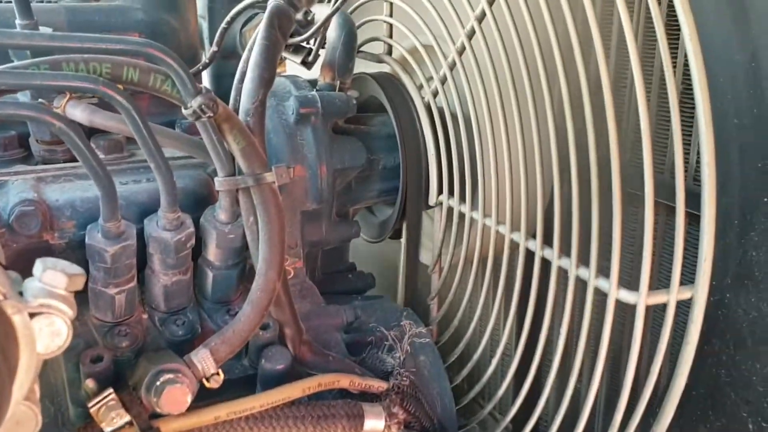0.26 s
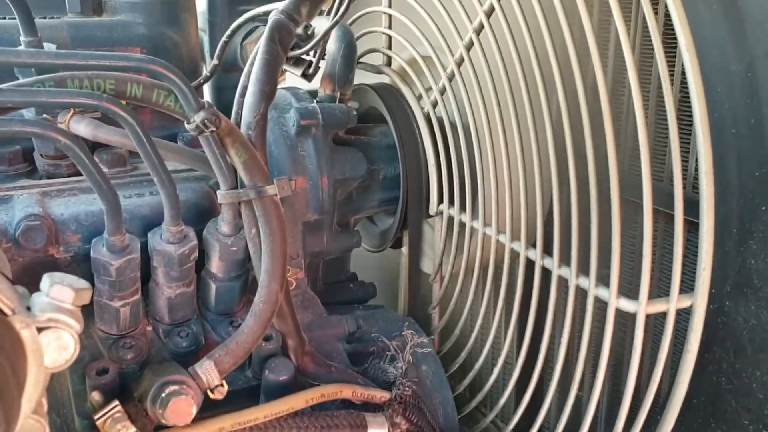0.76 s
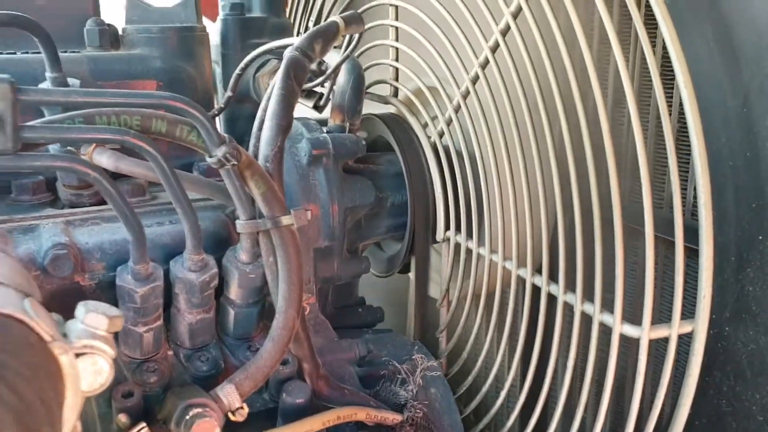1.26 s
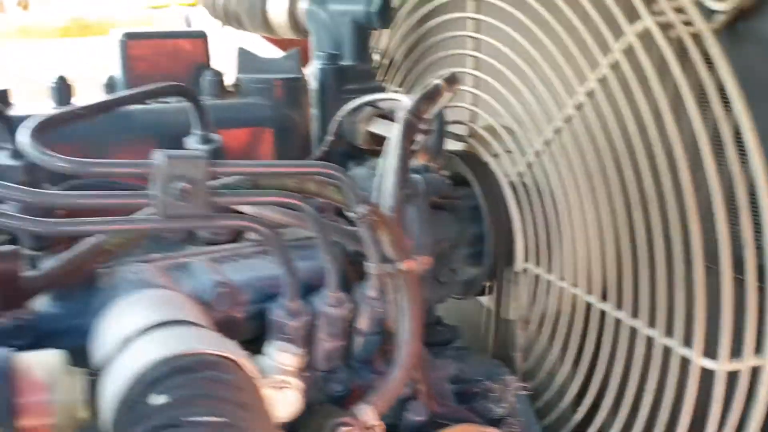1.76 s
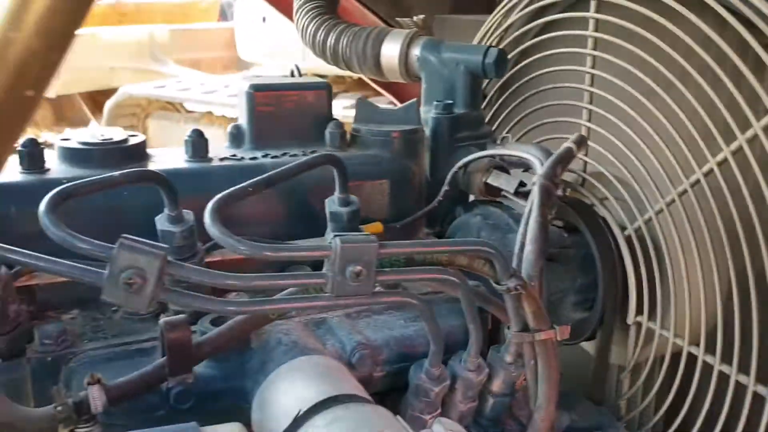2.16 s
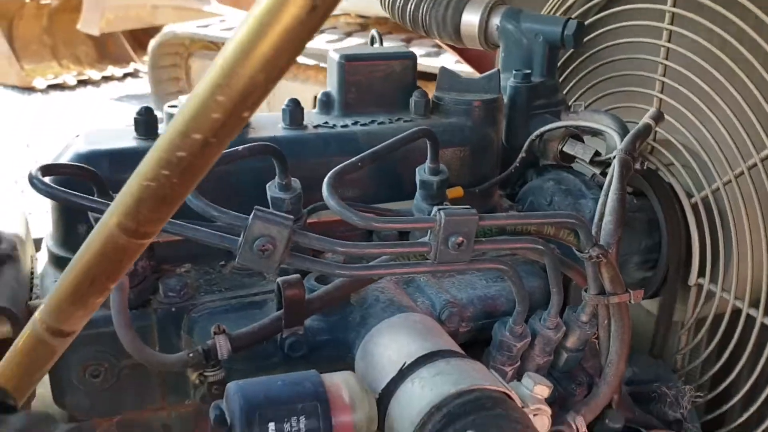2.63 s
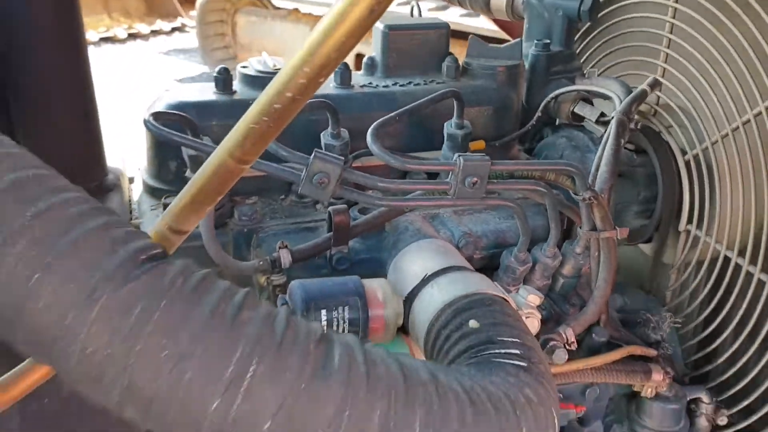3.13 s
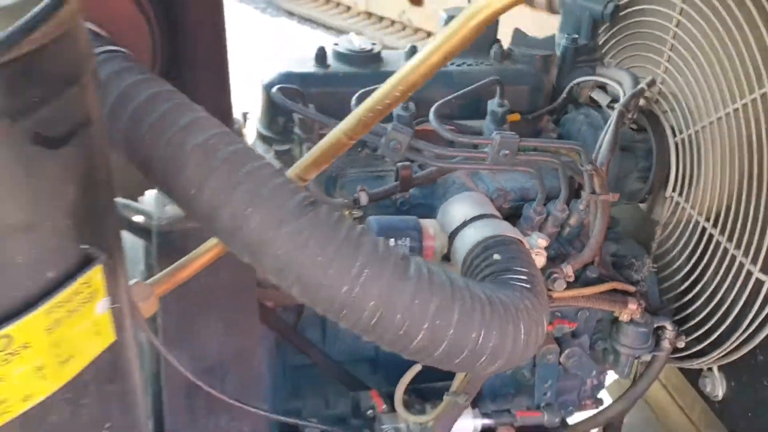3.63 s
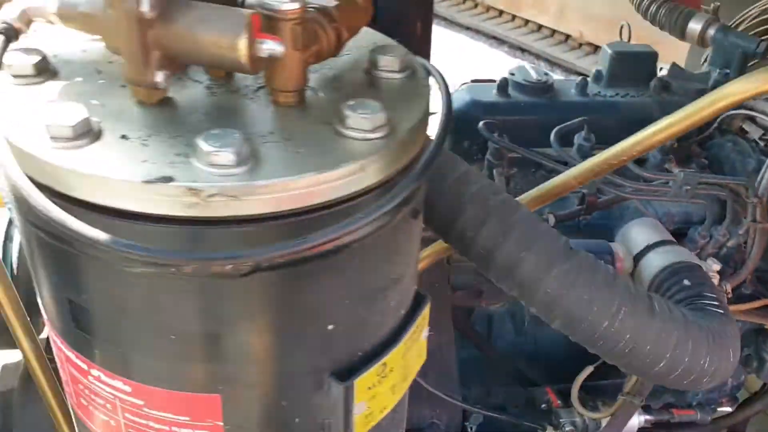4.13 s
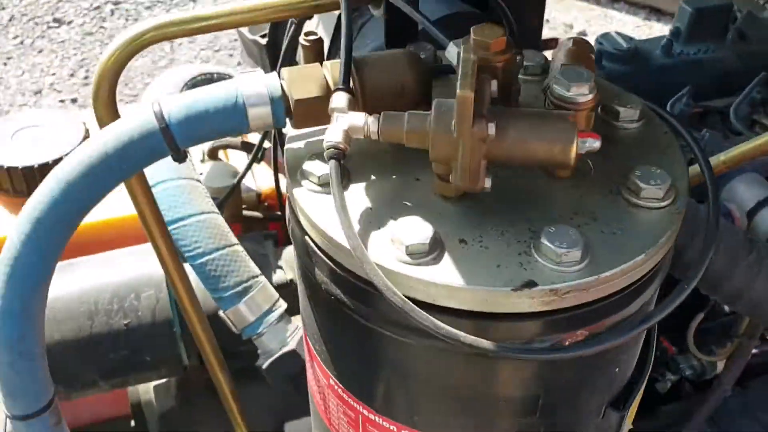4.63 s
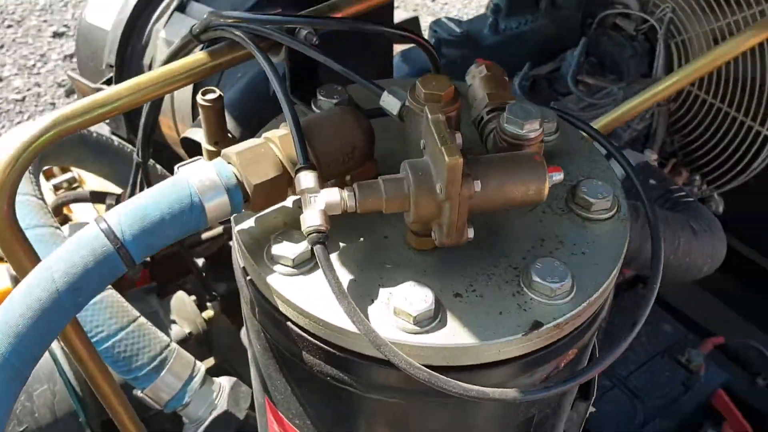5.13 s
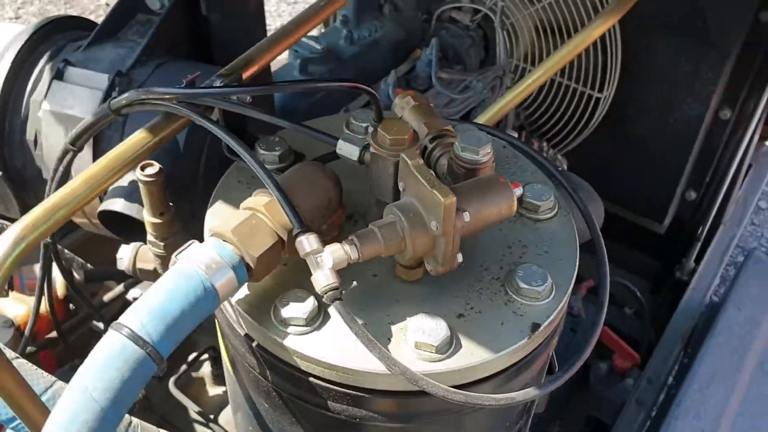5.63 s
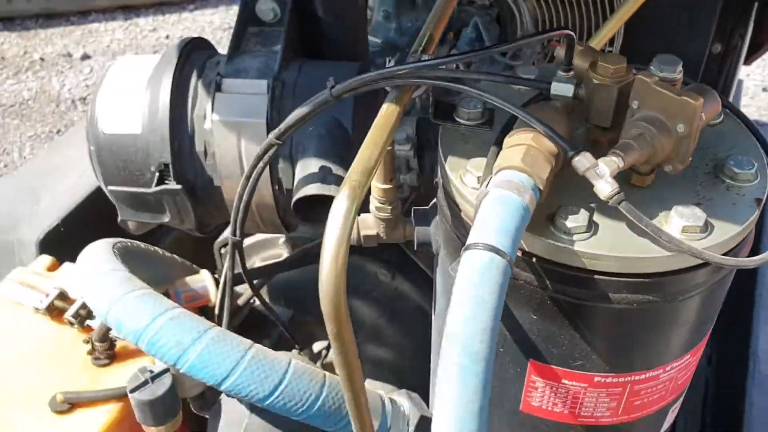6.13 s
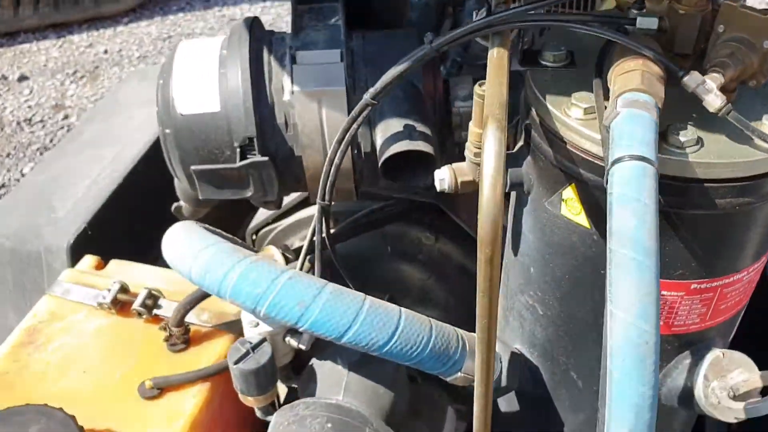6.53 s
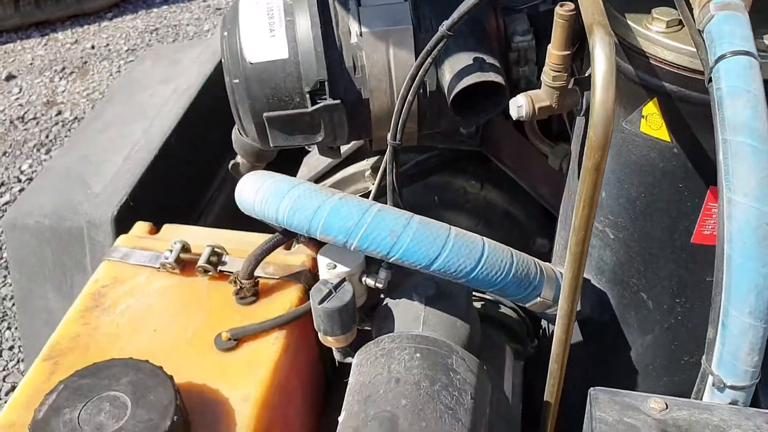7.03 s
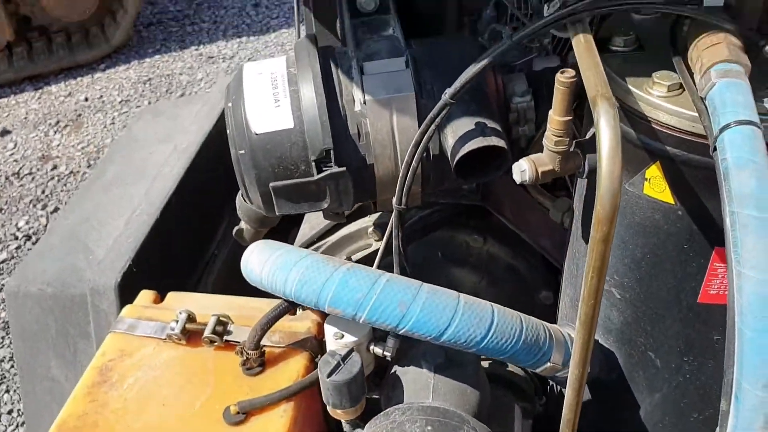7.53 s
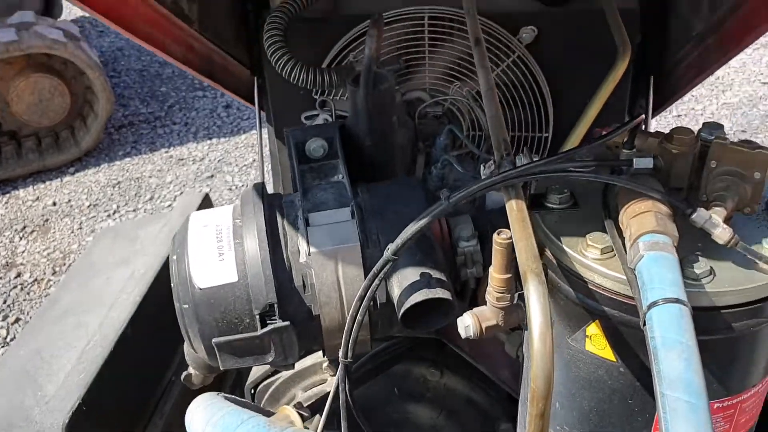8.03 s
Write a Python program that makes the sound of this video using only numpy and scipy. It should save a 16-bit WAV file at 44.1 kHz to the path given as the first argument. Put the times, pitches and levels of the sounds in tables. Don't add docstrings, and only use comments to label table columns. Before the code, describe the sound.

A small three-cylinder diesel runs an air compressor outdoors, already at steady speed and continuing to the end at about 8.3 seconds. From 0 to 1.5 seconds the phone is close to the injectors and fan: a low buzzing drone at roughly 53 hertz, rapid knocking clatter, whirring blade tones, broad airy roar and a bright compressed-air hiss. From about 1.7 to 3 seconds it backs away; engine and roar drop, while hiss leans to the left. Between 3 and 4.7 seconds, around the tank, tones are thinnest and the sound is at its weakest, the hiss sliding in colour. From 5 seconds it nears the intake, and by 6 the bass, clatter and roar are full again, with the hiss stronger on the right. It stays loud and dense, swelling slightly, without any stop. The stereo is wide, rough and close, with slightly rounded peaks and limited top treble.

```python
import sys
import numpy as np
from scipy import signal
from scipy.fft import rfft, irfft
from scipy.io import wavfile
from scipy.ndimage import uniform_filter1d, map_coordinates

SR = 44100
rng = np.random.default_rng(int(sys.argv[2]) if len(sys.argv) > 2 else 0)


def linear_from_db(decibels):
    return 10 ** (np.asarray(decibels, float) / 20)


def master_out(mix):
    frames = np.transpose(np.atleast_2d(mix))
    ceiling = np.clip(frames, -1, 1)
    pcm = np.round(ceiling * 32767).astype(np.int16)
    wavfile.write(sys.argv[1], SR, pcm)


N = 365148
FRAME = 512
SEAM_HZ = 4100


def unit(x):
    return x / np.sqrt(np.mean(x ** 2) + 1e-20)


def along(points, hz):
    f, v = np.transpose(points)
    return np.interp(np.log(hz + 1), np.log(f + 1), v)


def curves(rows, t=None):
    s, *cols = np.transpose(rows)
    at = np.arange(N) / SR if t is None else t
    return np.array([np.interp(at, s, c) for c in cols])


def wobble(rate_hz):
    knots = rng.standard_normal(int(N * rate_hz / SR) + 4)
    return map_coordinates(knots, [np.arange(N) * rate_hz / SR])


def spread(knots_hz, gains_db, hz):
    share = np.array([along(list(zip(knots_hz, one)), hz) for one in np.eye(len(knots_hz))])
    return share.T @ gains_db


def answer(rules, controls, t=None):
    rules = np.atleast_2d(rules)
    return rules[:, :1] + rules[:, 1:] @ curves(controls, t)


# t/s, nearness/dB, end faced (1 fan, -1 intake), left port's view into hood/dB
PHONE = [(0, 1.5, 0.51, 2), (.8, 2, 1, 0), (1.5, 1.5, 1, 0), (2, -.5, 0.8, 1.5), (2.4, -4, 0.093, 5),
         (2.8, -6, 0.55, 5.5), (3.2, -7.5, 0.57, 2.5), (3.7, -8, .1, -3), (4.2, -8, -0.11, 1.5),
         (4.5, -7.5, -0.43, 0), (4.8, -2.5, -0.19, -4.5), (5.3, -4, -1.15, -0.5), (5.7, 0, -0.95, 0.5),
         (6, 2.5, -1.24, 1), (6.8, 3.5, -0.54, -2.5), (7.6, 3.5, -1.44, -1), (8.28, 5, -1.06, -0.5)]


def by_phone(rules, t=None):
    return answer(rules, PHONE, t)


# t/s, place (0 injectors, 1 tank, 2 intake)
WALK = [
    (0, 0.048),
    (1.5, 0.14),
    (2.4, 0.62),
    (3.2, 1.34),
    (4.6, 1.06),
    (5.4, 1.43),
    (6.1, 1.92),
    (8.28, 1.97),
]


def place():
    return curves(WALK)[0]


def placed(levels_db):
    return np.interp(place(), np.arange(len(levels_db)), levels_db)


# t/s, four-stroke cycle rate/Hz
SPEED = [(0, 17.68), (.8, 17.705), (1.6, 17.695), (2.4, 17.661), (3.5, 17.63), (4.8, 17.652), (5.4, 17.7),
         (6.4, 17.72), (6.8, 17.74), (7.6, 17.736), (8.28, 17.753)]


def cycles():
    return np.cumsum(curves(SPEED)[0]) / SR


CYLINDERS = [0, -3, -0.79]


def firing_shape(turn, decay):
    stroke = turn * len(CYLINDERS)
    cylinder = np.floor(turn % 1 * len(CYLINDERS)).astype(int)
    return linear_from_db(np.array(CYLINDERS)[cylinder]) * np.exp(-(stroke % 1) / decay)


# t/s, left-right/dB
TONE_PAN = [(0, 4.5), (1.4, 4.5), (2, 3), (4.5, 3.5), (6, 3.5), (8.28, 1.5)]


def tone_pan_db():
    return curves(TONE_PAN)[0]


def tone(turns, level_db, pan_db, flutter_db, drift=0.23, start=None):
    start = rng.random() if start is None else start
    phase = 2 * np.pi * (turns + start) + drift * np.array([wobble(3), wobble(2.6)])
    gain = linear_from_db(level_db + pan_db / 2 * np.array([[1], [-1]]) + flutter_db * wobble(5))
    return np.sqrt(2) * gain * np.sin(phase)


def rush(size, shape, patchy_db, ripple_db, port_turn=0):
    hz, t, z = signal.stft(rng.standard_normal((3, N)), SR, nperseg=size)
    level_db, alike, lead_ms = shape(hz, t)
    alike = np.clip(alike, 0, 1)
    turn = np.exp(1j * np.pi * (hz[:, None] * lead_ms / 1000 + port_turn))
    shared = np.sqrt(alike) * z[0] * np.array([turn, 1 / turn])
    pair = shared + np.sqrt(1 - alike) * z[1:]

    def field(bins, frames):
        across = uniform_filter1d(rng.standard_normal(pair.shape), bins, axis=1)
        return unit(uniform_filter1d(across, frames, axis=2))
    patches_db = patchy_db * field(bins=5, frames=9)
    echoes_db = ripple_db * field(bins=4, frames=SR // size * 2)
    gain = np.sqrt(SR / 2) * linear_from_db(level_db + patches_db + echoes_db)
    return signal.istft(pair * gain, SR, nperseg=size)[1][:, :N]


# t/s, left port lead/ms, share of direct sound
LEAK = [(0, .465, .45), (1.7, .465, .45), (1.9, .54, .7), (2.9, .54, .8), (3.2, .49, .65), (3.45, .44, .5),
        (3.9, .25, .35), (4.4, .12, .3), (5, -.03, .3), (5.5, .04, .55), (5.75, .1, .5), (6.2, .02, .45),
        (7.3, -.04, .4), (7.8, .04, .45), (8.28, -.02, .3)]


def leak_direction(t):
    return curves(LEAK, t)


# f/Hz, level/dB per Hz
ROAR_LEFT = [(25, -69), (40, -57), (75, -60.5), (130, -55.5), (200, -57.5), (300, -60), (420, -60),
             (600, -63), (900, -60.5), (1300, -62.5), (1900, -64), (2700, -63.5), (3600, -62.5),
             (4600, -60)]
ROAR_RIGHT = [(25, -59), (40, -53.5), (75, -55), (130, -59), (200, -57), (300, -65), (420, -67), (600, -67),
              (900, -66.5), (1300, -71), (1900, -65.5), (2700, -76), (3600, -70), (4600, -74)]
# f/Hz, share
ROAR_ALIKE = [(40, .9), (130, 0.32), (300, 0.71), (700, 0.8), (1400, 0.21), (3000, 0.025)]
# mean/dB, per dB nearness, dB per end, per dB view
ROAR_ANSWER = [
    (-0.74, 0.9, 2, 1),
    (-0.41, 1.25, 0, 0.22),
    (-0.25, 0.69, 1.25, 0.73),
    (0.33, 1.47, -0.05, 0.5),
]


def roar():
    def shape(hz, t):
        bass_left, bass_right, middle_left, middle_right = by_phone(ROAR_ANSWER, t)
        exhaust_db = curves(PHONE, t)[0]
        deep = 0.83 * (uniform_filter1d(exhaust_db, size=9) - np.median(exhaust_db))
        knots_hz = [110, 450, 2200]
        left = along(ROAR_LEFT, hz)[:, None] + spread(knots_hz, [deep, bass_left, middle_left], hz)
        right = along(ROAR_RIGHT, hz)[:, None] + spread(knots_hz, [deep, bass_right, middle_right], hz)
        edge_db = np.where((hz > 30) & (hz < SEAM_HZ), -1.5, -120)[:, None]
        lead_ms = 0.57 * leak_direction(t)[0]
        return np.array([left, right]) + edge_db, along(ROAR_ALIKE, hz)[:, None], lead_ms
    turns = cycles()
    firing = (turns * len(CYLINDERS)).astype(int)
    uneven = linear_from_db(rng.normal(0, 4, firing[-1] + 1))[firing]
    swell = unit(1 + 0.23 * uneven * firing_shape(turns, decay=.35))
    return rush(4 * FRAME, shape, patchy_db=2.04, ripple_db=1.5) * swell


def dips(rows, hz, t):
    width, fade_s = 0.07, 0.14
    loss = 0
    for start, end, from_hz, to_hz, depth_db in rows:
        centre = np.interp(t, [start, end], [from_hz, to_hz])
        present = np.clip(np.minimum(t - start, end - t) / fade_s, 0, 1)
        loss = loss - depth_db * present * np.exp(-((hz[:, None] / centre - 1) / width) ** 2)
    return loss


# f/Hz, level/dB per Hz
HISS_LEFT = [(3600, -67), (4600, -64.5), (5500, -64), (6500, -62.5), (7400, -65.5), (7900, -67.5),
             (8250, -72.5), (8900, -67), (9600, -68), (10500, -62.5), (11500, -57), (12500, -59),
             (14000, -58), (15600, -63.5)]
HISS_RIGHT = [(3600, -66), (4600, -70.5), (5500, -70.5), (6500, -62.5), (7400, -68), (7900, -76),
              (8250, -68.5), (8900, -82.5), (9600, -72.5), (10500, -67.5), (11500, -64), (12500, -58),
              (14000, -62), (15600, -58)]
# f/Hz, part of the direct share
LEAK_ALIKE = [(4000, .4), (6500, .9), (8500, .3), (10300, .4), (11500, 1), (15000, 1)]
# t/s, jet strength/dB, right port turned to it/dB, brightening/dB, left port in beam/dB
JET = [(0, 2, 2.5, -3.5, -1.5), (1.12, 3, 3, -2, -2), (1.56, 3, -0.5, -2.5, -1), (2, 4, -9.5, 1, 1),
       (2.92, 2, -13, 6, 1.5), (3.08, 0, -7, 3.5, -1), (3.44, -1.5, -13, -2.5, -2),
       (3.84, -3, -25, 0, -0.5), (4.04, -4, -8, 3, 1), (4.52, -4.5, -2, 2, 0.5), (4.84, -4.5, 2.5, -2.5, 1),
       (5.2, -3, 8, -3, 7), (5.45, -1.5, 6.5, -3, 0.5), (5.72, 3, 11.5, 0.5, 4), (6.2, 1, 9.5, 1.5, -1),
       (6.76, -0.5, 8.5, 2.5, -2.5), (7.6, -1, 4.5, -1.5, -6.5), (8.28, -0.5, 8.5, -2.5, 8)]
SHADE_HZ = [6600, 9500, 12000, 14600]
# mean/dB, dB per dB of strength, turning, brightening, beam
LEFT_ANSWER = [(1, 0.74, 0.039, -0.046, 0.02), (2.5, 1.02, .01, 0.17, 0.18),
               (0.5, 0.73, -0.061, 0.05, 0.86), (.1, 1.87, -.1, 0.017, -.4)]
RIGHT_ANSWER = [(0.95, 1.4, 0.011, -0.35, -0.15), (-0.92, .01, 1.22, -0.83, 0.074),
                (0.25, 0.32, 0.76, 1.2, .1), (-1.2, .1, 0.12, .8, -.1)]
# start t/s, end t/s, start f/Hz, end f/Hz, depth/dB
DIPS_LEFT = [
    (3.0, 3.6, 11600, 10700, 4),
    (5.0, 6.1, 9000, 8600, 4.5),
    (6.25, 6.7, 5100, 4800, 7),
    (6.6, 7.7, 10100, 10600, 3),
]
DIPS_RIGHT = [
    (1.5, 3.1, 5260, 4850, 3.4),
    (1.6, 4.3, 10500, 10600, 5),
    (4.5, 6.3, 5870, 6300, 14),
    (4.5, 6.5, 8850, 8800, 3.6),
    (6.25, 6.7, 5100, 4900, 7),
]


def hiss():
    def shape(hz, t):
        left_shade = spread(SHADE_HZ, answer(LEFT_ANSWER, JET, t), hz)
        right_shade = spread(SHADE_HZ, answer(RIGHT_ANSWER, JET, t), hz)
        left = along(HISS_LEFT, hz)[:, None] + left_shade + dips(DIPS_LEFT, hz, t)
        right = along(HISS_RIGHT, hz)[:, None] + right_shade + dips(DIPS_RIGHT, hz, t)
        lead_ms, direct = leak_direction(t)
        edge_db = np.where(hz >= SEAM_HZ, 0, -120)[:, None]
        return np.array([left, right]) + edge_db, along(LEAK_ALIKE, hz)[:, None] * direct, lead_ms
    return rush(FRAME, shape, patchy_db=1.08, ripple_db=0.77, port_turn=-.3)


# mean/dB, per dB nearness, dB per end, per dB view
BLADES = [
    (-37, 1.14, 5.5, -0.11),
    (-47, 1.16, 1.5, -.1),
]
# level/dB at injectors, tank, intake
FAN_UPPER = [
    (-44, -63, -56),
    (-47.5, -58, -55),
]
# level/dB at injectors, tank, intake
BEAT_DB = [-47.5, -60.5, -42.5]


def fan():
    blades_per_cycle = 12.866
    beat_order, beat_start_turns = 13, -.03
    levels_db = [*by_phone(BLADES), *map(placed, FAN_UPPER)]
    engine_turns, pan_db = cycles(), tone_pan_db()
    turns = blades_per_cycle * engine_turns + 0.039 * wobble(4)
    out = tone(beat_order * engine_turns, placed(BEAT_DB), pan_db, flutter_db=4.0, drift=0.16,
               start=beat_start_turns)
    for k, db in enumerate(levels_db):
        out += tone((k + 1) * turns, db, pan_db, flutter_db=1.2 + .3 * k, drift=0.15 + 0.2 * k, start=0)
    return out


# f/Hz, level/dB
KNOCK = [(250, -120), (330, 6.5), (700, -10), (1200, 2.5), (1900, -1), (2600, -5.5), (4500, -10.5),
         (6000, -120)]
# level/dB at injectors, intake
KNOCK_DB = [-41, -42.5]


def knock():
    size = 1024
    turns, rate_hz = cycles(), curves(SPEED).mean()
    blows = firing_shape(np.arange(size) / size, decay=0.21) + 0.41
    common = rng.standard_normal((2, 1, size))
    raw = common + 0.84 * rng.standard_normal((2, 2, size))
    colour = linear_from_db(along(KNOCK, rate_hz * np.arange(size // 2 + 1)))
    cycle = irfft(rfft(raw * blows) * colour, size)
    where = [turns % 1 * size]
    heard = [[map_coordinates(unit(c), where, mode="grid-wrap") for c in end] for end in cycle]
    far = np.clip(place() / 2, 0, 1)
    near_gain = linear_from_db(KNOCK_DB[0]) * np.sqrt(1 - far)
    far_gain = linear_from_db(KNOCK_DB[1]) * np.sqrt(far)
    mix = near_gain * heard[0] + far_gain * heard[1]
    return mix * linear_from_db(by_phone(ROAR_ANSWER[:2]) + 0.83 * wobble(8))


# mean/dB, per dB nearness, dB per end, per dB view
THIRD = (-39.5, 0.72, -2.5, -0.2)
ORDERS = [4, 5, 6, 7, 8, 10, 11, 12, 14, 15, 39, 17, 19, 20, 22, 30, 38, 43, 56, 91, 102, 111]
# level/dB at injectors, tank, intake
ORDERS_HEARD = [(-63, -71, -58), (-52, -68, -62), (-43, -87, -52), (-42, -60, -51), (-59, -70, -57),
                (-48, -56, -55), (-47, -72, -65), (-35.5, -50, -47), (-47, -65, -44), (-40, -66, -40.5),
                (-53, -75, -46.5), (-60, -89, -57), (-46.5, -66, -54), (-57, -67, -51.5),
                (-45.5, -55.5, -53.5), (-55, -63.5, -48), (-46, -77, -64), (-61, -86, -54), (-61, -72, -47),
                (-45, -70, -60), (-47.5, -67, -61), (-46, -61, -50.5)]


def engine():
    firing_db = -30 + curves(PHONE)[0]
    third_db = by_phone(THIRD)[0]
    turns, pan_db = cycles(), tone_pan_db()
    out = tone(len(CYLINDERS) * turns, firing_db, pan_db, flutter_db=.2, drift=.05, start=0)
    out += tone(len(CYLINDERS) ** 2 * turns, third_db, pan_db, flutter_db=1.2, drift=.15, start=.5)
    for order, levels_db in zip(ORDERS, ORDERS_HEARD):
        start = 0 if order == 15 else None
        order_pan_db = pan_db + rng.normal(0, 2)
        out += tone(order * turns, placed(levels_db), order_pan_db, flutter_db=2.5, drift=.5, start=start)
    return out


def scene():
    return roar() + hiss() + fan() + knock() + engine()


def roll_off(x):
    return signal.sosfilt(signal.butter(12, 16250, fs=SR, output="sos"), x)


# f/Hz, level/dB per Hz re whole sound
WEAKEST = [(1500, -68), (2200, -57), (3500, -53), (5000, -51), (6500, -51), (8500, -51), (11000, -52),
           (15000, -50)]


def record(dry):
    top_hz = 15730
    soft = dry / (1 + np.abs(dry / .75) ** 4) ** (1 / 4)
    hz, t, z = signal.stft(soft, SR, window="cosine", nperseg=4 * FRAME)
    power = np.abs(z) ** 2
    whole = power.sum(axis=1).mean(axis=0)
    weakest = whole * hz[1] * linear_from_db(along(WEAKEST, hz))[:, None] ** 2
    kept = (uniform_filter1d(power, size=3, axis=1) > weakest) & (hz < top_hz)[:, None]
    thinned = signal.istft(z * kept, SR, window="cosine", nperseg=4 * FRAME)[1][:, :N]
    return roll_off(thinned)


dry = scene()
out = record(dry)
master_out(out)
```